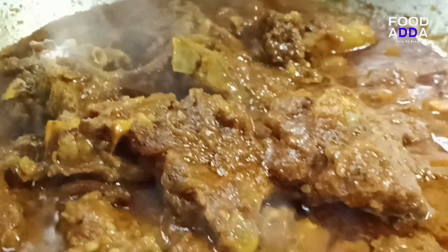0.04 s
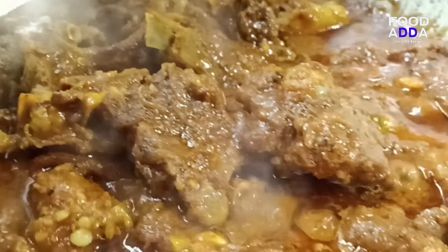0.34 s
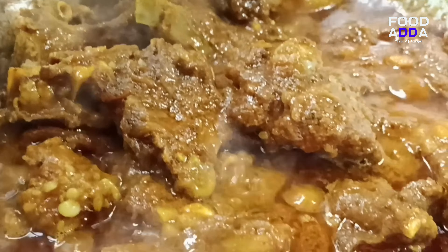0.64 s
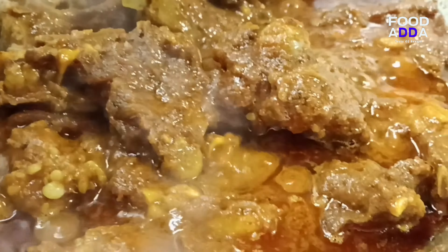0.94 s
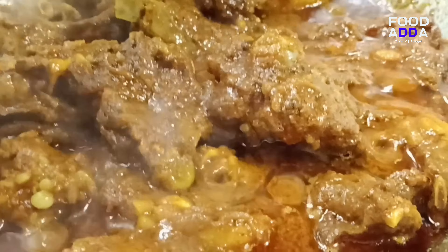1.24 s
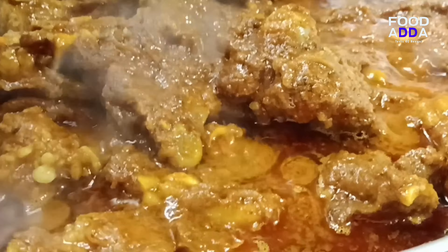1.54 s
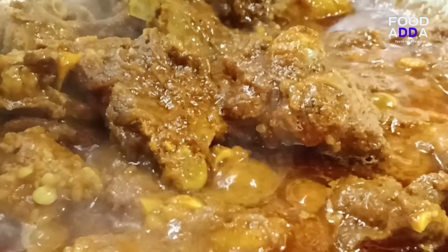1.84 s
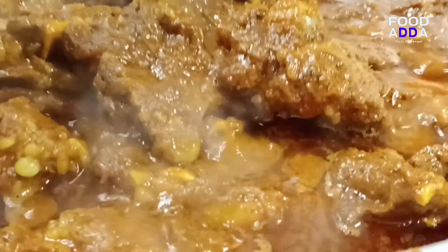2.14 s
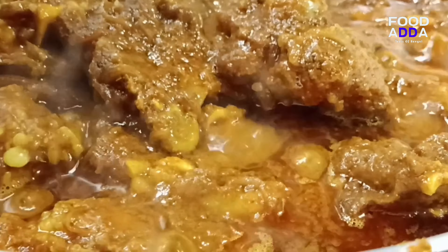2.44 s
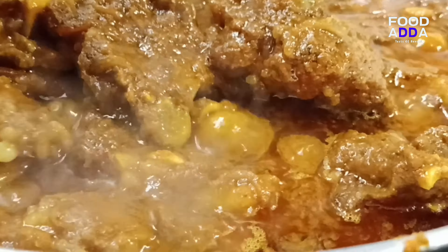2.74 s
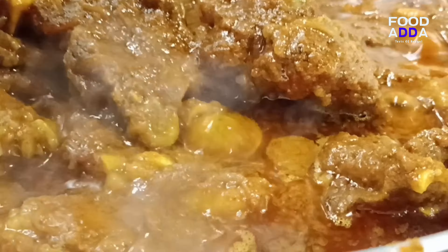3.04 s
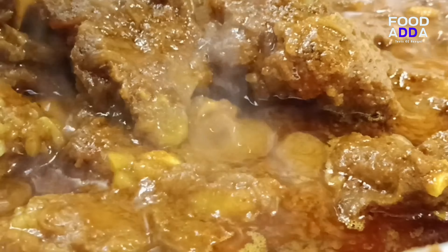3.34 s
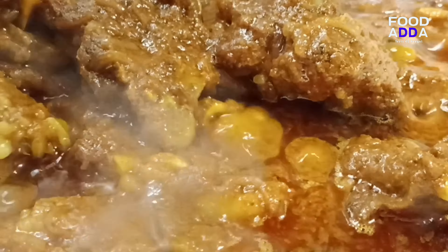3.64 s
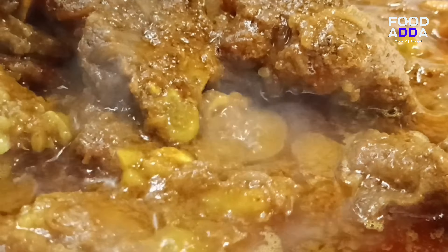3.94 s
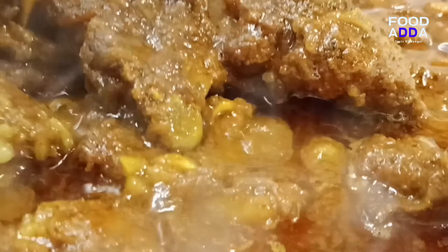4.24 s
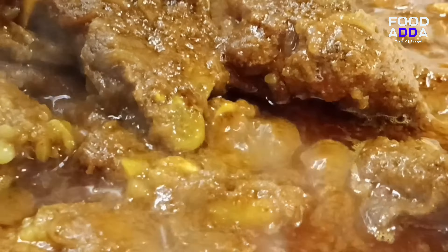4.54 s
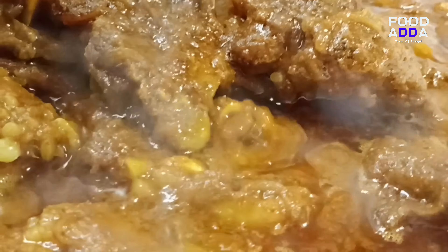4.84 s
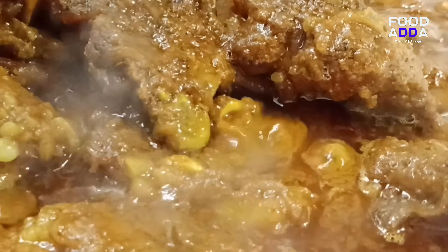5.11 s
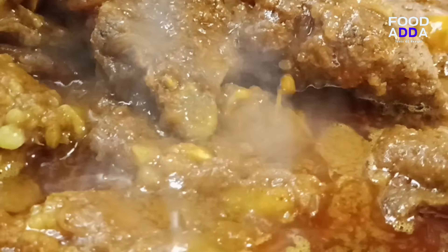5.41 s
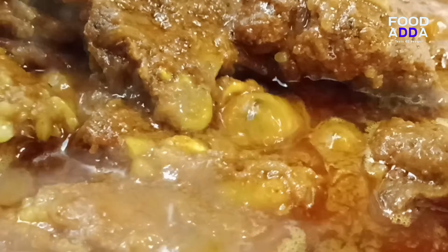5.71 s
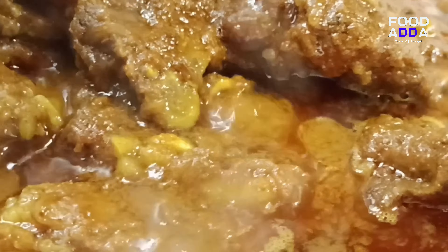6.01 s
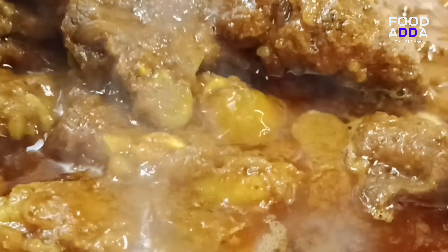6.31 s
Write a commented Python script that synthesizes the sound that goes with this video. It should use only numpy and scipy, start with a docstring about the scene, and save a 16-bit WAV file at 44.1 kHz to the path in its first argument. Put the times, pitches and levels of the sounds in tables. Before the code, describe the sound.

Meat sizzles steadily in thick, oily gravy while a big bubble repeatedly hisses out steam and blubbers shut, with small snaps of fat.

```python
"""Meat sizzles in thick, oily gravy, close up in a small kitchen. A bed of fine frying runs from the
start, with wet spots sputtering over it. Drops of fat snap; small bubbles plip and gurgle. From 0.6 s
one big bubble swells about every two thirds of a second: it lets its steam out with a hiss, then
blubbers shut. Around 3 s, and again just after, steam whistles thinly through a pinhole, while the
frying and the big bubble carry on to the end."""
import sys
import numpy as np
from scipy import signal
from scipy.fft import rfft, irfft, next_fast_len
from scipy.io import wavfile

SR = 44100
rng = np.random.default_rng(int(sys.argv[2]) if len(sys.argv) > 2 else 0)


def transcribe(signal):
    """Save signal, clipped to [-1, 1], as a 16-bit WAV file at the path in sys.argv[1]."""
    frames = np.atleast_2d(signal).T
    limited = np.clip(frames, -1, 1)
    pcm = np.round(limited * 32767).astype(np.int16)
    wavfile.write(sys.argv[1], SR, pcm)


N = 285327
TIME = np.arange(N) / SR

# Levels are set ahead of each layer's own trim and reverb.
# fader ride of the frying bed: t/s, level/dB
FRY_RIDE = [(0, -51), (.72, -51), (.94, -52.5), (1.7, -51), (2.05, -50), (4.45, -50.5), (4.95, -48.5),
            (5.3, -50.5)]
# EQ of the frying bed: f/Hz, level/dB
FRY_EQ = [(400, -17), (800, -17), (1100, -27), (1500, -12), (2200, -9.5), (3600, -0.5), (4350, -10),
          (5300, -1), (6800, -2), (8000, -15), (10000, -22), (12200, -15), (15500, -15)]
# air resonances between the pan's walls: f/Hz, width/Hz, level/dB
PAN_AIR_MODES = [(673, 34, -8), (1070, 70, 0), (1275, 65, 0), (1500, 120, 3), (1980, 130, 2)]
# water meeting hot fat: t/s, length/s, level/dB, f/Hz
SPURT_CUES = [(0, 0.054, -49, 3300), (0.256, 0.12, -51, 3000), (0.496, 0.077, -50, 2976),
              (0.622, .17, -53, 3130), (.84, .12, -52, 3415), (1.027, .095, -51.5, 3080),
              (1.561, 0.095, -54, 3240), (2.135, 0.18, -52.5, 3185), (2.527, 0.075, -53, 3214),
              (2.78, 0.18, -59, 3500), (2.952, 0.057, -51, 3590), (3.1, 0.1, -49.5, 3000),
              (3.459, .2, -58.5, 3280), (3.686, .13, -54.5, 3280), (3.941, 0.14, -50, 3380),
              (4.209, .19, -56.5, 3167), (4.314, 0.021, -50.5, 3420), (4.461, 0.26, -59.5, 3363),
              (4.925, 0.27, -55.5, 3430), (5.729, .13, -55, 3100), (6.16, .1, -54, 3470),
              (6.3, 0.31, -57.5, 3515)]
# the loudest drops of fat snapping: t/s, level/dB, f/Hz, left minus right/dB
SNAP_CUES = [(0.402, -20, 5830, 9), (0.5307, -18, 2740, 8), (2.1435, -22, 3160, 15),
             (2.2555, -14.5, 3170, 3), (3.9936, -24, 3100, 4), (5.6775, -10, 2910, 10.5),
             (5.8192, -25, 5000, 7)]
# the clearest small bubbles bursting: t/s, level/dB, f/Hz
PLIP_CUES = [(0.305, -30.5, 1525), (1.1625, -52, 1060), (2.062, -43, 1255), (2.516, -43, 1520),
             (2.7755, -46, 1100), (2.864, -37.5, 1530), (3.776, -31.5, 2940), (4.369, -37, 1900),
             (4.392, -43.5, 1440), (4.7522, -33, 1730), (5.497, -47.5, 1420)]
# chains of tiny bubbles: t/s, length/s, level/dB, f/Hz
GURGLE_CUES = [(0.311, .04, -61.5, 1140), (0.999, 0.083, -66.5, 1020), (3.155, 0.086, -63.5, 1040),
               (3.505, 0.21, -63, 1257), (4.195, 0.14, -61.5, 1070), (5.946, 0.066, -59, 1290),
               (6.185, .04, -62.5, 1100)]
# the big bubble venting: t/s, length/s, hiss level/dB, whistle level/dB, mouth f/Hz
VENT_CUES = [(0.596, 0.084, -56.5, -75, 2600), (1.298, 0.34, -55.5, -73, 2660),
             (1.97, 0.26, -55, -69, 2456), (2.62, 0.29, -52.5, -65, 2477), (3.255, 0.23, -52, -63, 2203),
             (3.86, 0.26, -56.5, -61, 2327), (4.603, 0.3, -56, -78, 2404), (5.203, .19, -53.5, -50.5, 2080),
             (5.858, 0.34, -54, -78, 2360)]
# EQ of the steam's hiss: f/Hz, level/dB
STEAM_EQ = [(900, -12.5), (1400, -4.5), (2000, 1), (2600, 7.5), (3800, 7), (6500, -1.5), (9500, -18),
            (12500, -9.5), (14500, 0), (15500, -27)]
# the gravy gulping as steam pushes through: t/s, length/s, level/dB, f/Hz
GULP_CUES = [(0.664, 0.17, -65, 105.2), (1.323, 0.095, -62, 63.4), (1.42, 0.08, -55, 157.5),
             (2.07, 0.07, -57, 228), (2.09, 0.14, -53.5, 151.1), (2.677, 0.14, -50.5, 240),
             (2.66, .19, -51.5, 140), (2.66, 0.22, -59, 402), (3.195, 0.04, -58.5, 236.7),
             (3.265, 0.1, -50.5, 153.2), (3.324, 0.13, -53, 235.6), (3.39, 0.15, -54, 135.7),
             (3.69, 0.073, -62, 127.4), (3.929, 0.038, -56, 129), (4.018, 0.1, -54, 136.4),
             (4.663, 0.098, -52.5, 160.4), (4.778, 0.16, -59, 98), (5.272, 0.045, -47, 237),
             (5.33, 0.11, -46, 151), (5.94, 0.063, -55.5, 235.4), (6.0, 0.079, -52.5, 154.5)]
# resonances of the gravy pocket: f/Hz, width/Hz, level/dB
POCKET_MODES = [(50.3, 13, -11.5), (108, 26, 8.5), (164.8, 24.7, 8.5), (250, 44, 9), (464, 270, 8)]
# steam whistling through a pinhole: t/s, length/s, level/dB, f/Hz
PINHOLE_CUES = [(2.9, .3, -51.5, 3130), (3.599, 0.51, -53, 3103)]
# stereo tilt of the microphone pair: f/Hz, left minus right/dB
MIC_BALANCE = [(1150, -0.5), (1800, 3), (2900, 10.5), (4400, 2.5), (5400, 0.5), (6600, 12), (8300, -5.5),
               (10000, -6.5), (14300, 17)]

LEFT_RIGHT = np.array([[1], [-1]])
KITCHEN_T60_S = 0.14


def from_db(db):
    """Decibels to gain."""
    return 10 ** (np.asarray(db) / 20)


def unit_rms(x):
    """Normalise to rms 1."""
    return x / np.sqrt(np.mean(x ** 2) + 1e-20)


def at_hz(curve, hz):
    """Read an EQ curve on a log-frequency axis."""
    known, values = np.transpose(curve)
    return np.interp(np.log(hz + 1e-9), np.log(known), values)


def drift(rate_hz):
    """A smooth random modulator, rms about 1."""
    hop, run_in = 40, 2000
    r = np.exp(-2 * np.pi * hop * rate_hz / SR)
    slow = signal.lfilter([1], [1, -2 * r, r * r], rng.standard_normal(N // hop + run_in + 2))[run_in:]
    return np.interp(np.arange(N) / hop, np.arange(len(slow)), unit_rms(slow))


def resonance(x, hz, width_hz):
    """Two-pole resonator, unity gain at its peak."""
    r = np.exp(-np.pi * width_hz / SR)
    poles = [1, -2 * r * np.cos(2 * np.pi * hz / SR), r * r]
    return signal.lfilter(np.array([1, 0, -1]) * (1 - r * r) / 2, poles, x + 1e-18)


def pass_filter(x, order, hz, kind):
    """Low-, high- or band-pass."""
    return signal.sosfilt(signal.butter(order, hz, kind, fs=SR, output="sos"), x)


def equalise(x, gain_db):
    """Apply an EQ given as a function of Hz."""
    size = next_fast_len(N + SR // 10)
    hz = np.arange(size // 2 + 1) * SR / size
    return irfft(rfft(x, size) * from_db(gain_db(hz)), size)[..., :N]


def bursts(per_s, spread_db):
    """Clicks at random moments: many small, a few large."""
    sizes = from_db(spread_db * np.minimum(rng.exponential(1, N), 5))
    return (rng.random(N) < per_s / SR) * sizes * rng.choice([-1, 1], N)


def swell(start, length):
    """A rounded envelope: its samples, its progress (0 to 1 during the cue) and its gain."""
    span = slice(max(round((start - length) * SR), 0), round((start + 2 * length) * SR))
    life = np.clip((TIME[span] - start) / length, -1, 2)
    return span, life, 1 / (1 + (2 * life - 1) ** 8)


def pan_and_kitchen(x, wall_db, room_db, wall_t60=0.067, lag_s=0.00024):
    """Stereo space: the direct sound (left later), quick slaps off the pan wall, the kitchen's tail."""
    t = np.arange(SR // 2) / SR
    wall, room = rng.standard_normal((2, 2, len(t)))
    wall = wall * (rng.random(wall.shape) < 1 / 10) * (t > .0005) * from_db(-60 * t / wall_t60)
    room = room * (t > .006) * from_db(-60 * t / KITCHEN_T60_S)
    echoes = sum(from_db(db) * tail / np.linalg.norm(tail, axis=1, keepdims=True)
                 for tail, db in ((wall, wall_db), (room, room_db)))
    direct = np.array([np.roll(x, round(lag_s * SR)), x])
    return direct + signal.fftconvolve(x[None], echoes, axes=1)[:, :N]


def crackle(eq, per_s, spread_db, clump_db, patchy_db, cycles):
    """Tiny bubbles of all sizes burst in clumps at four spots of the pan, each ringing briefly."""
    pitches = np.geomspace(400, 16000, 32)
    clicks = bursts(per_s, spread_db) * from_db(clump_db * drift(10))
    band = rng.choice(len(pitches), N, p=pitches / pitches.sum())   # small bubbles are the most common
    lags_s = np.linspace(.0001, .0004, 4)
    spots = np.zeros((len(lags_s), N))
    for k, hz in enumerate(pitches):
        ringing = resonance(clicks * (band == k), hz, hz / cycles)
        spots[k % len(spots)] += unit_rms(ringing) * np.sqrt(hz) * from_db(patchy_db * drift(9.1))
    stereo = sum(pan_and_kitchen(spot, wall_db=4.5, room_db=6, wall_t60=0.031, lag_s=lag)
                 for spot, lag in zip(spots, lags_s))
    return unit_rms(equalise(stereo, lambda hz: at_hz(eq, hz)))


def sizzle():
    """The bed: steady fine frying over a soft simmer that rings in the pan's air."""
    fry = crackle(FRY_EQ, per_s=8000, spread_db=4, clump_db=.8, patchy_db=1.7, cycles=9)
    fader = from_db(np.interp(TIME, *np.transpose(FRY_RIDE)))
    simmer = np.zeros(N)
    for hz, width, db in PAN_AIR_MODES:
        gain = from_db(db + 5 * drift(7))
        simmer += gain * unit_rms(resonance(bursts(per_s=200, spread_db=2), hz, width))
    simmer = unit_rms(pan_and_kitchen(simmer, wall_db=7, room_db=-23))
    return from_db(6) * fader * fry + from_db(-64) * simmer


def singing(hz, width_hz):
    """A cavity stirred by turbulence sings: a noise band riding a pitch curve, rms 1."""
    run_in = SR // 10
    stir = rng.standard_normal((2, run_in + len(hz)))
    a, b = pass_filter(stir, 2, width_hz / 2, "low")[:, run_in:]
    phase = 2 * np.pi * np.cumsum(hz) / SR
    return unit_rms(a * np.cos(phase) + b * np.sin(phase))


def spurts(fade_db=-3, throb_db=4, gap_width_hz=750, wander=.045, rush_db=-1, linger_db=-10):
    """Water hits hot fat in a rush of tiny bursts, rings in its shifting escape gap and sputters out."""
    rush = unit_rms(pass_filter(bursts(per_s=5000, spread_db=5.5), 4, [2400, 4000], "band"))
    bend = np.exp(wander * drift(14))
    throb = from_db(throb_db * drift(52))
    out = np.zeros(N)
    for start, length, db, hz in SPURT_CUES:
        span, life, gain = swell(start, length)
        gain = np.maximum(gain, from_db(linger_db) * (1 - (life - 1) ** 4))
        sputter = singing(hz * bend[span], gap_width_hz) + from_db(rush_db) * rush[span]
        out[span] += from_db(db + fade_db * (life - 1)) * gain * unit_rms(sputter * throb[span])
    return pan_and_kitchen(out, wall_db=-4, room_db=5.5)


def small_drops(per_s=2.9, db=-35.5, hz=5600, scatter_octaves=0.25, scatter_db=4.5):
    """Cues for small drops of fat snapping at loose intervals: t/s, level/dB, f/Hz."""
    timing, strength, tuning = rng.uniform(-1, 1, (64, 3)).T
    starts = (np.arange(len(timing)) + .5 + .5 * timing) / per_s
    cues = np.transpose([starts, db + scatter_db * strength, hz * 2 ** (scatter_octaves * tuning)])
    return cues[starts < TIME[-1] - .01]


def snaps(cycles=2.5, tick_db=-22):
    """A drop of fat bursts with a bright tick and a heavily damped crack; small drops tick the most."""
    out = np.zeros((2, N))
    small = [(start, db, hz, at_hz(MIC_BALANCE, hz)) for start, db, hz in small_drops()]
    for start, db, hz, left_db in [*SNAP_CUES, *small]:
        span = slice(round(start * SR), round(start * SR) + SR // 20)
        life = np.clip((TIME[span] - start) * hz / cycles, 0, 10)
        crack = life ** 2 * np.exp(2 - 4 * life) * np.sin(2 * np.pi * cycles * life)
        crack[8] += from_db(tick_db) * (hz / 2500) ** 2   # one-sample tick on the attack
        lean_db = left_db - at_hz(MIC_BALANCE, hz)   # the microphones add the rest of the panning
        out[:, span] += from_db(db + LEFT_RIGHT * lean_db / 2) * crack
    stereo = np.array([pan_and_kitchen(out[k], wall_db=0, room_db=-1, wall_t60=.12)[k] for k in (0, 1)])
    return from_db(8) * pass_filter(stereo, 2, 1700, "high")


def plips(cycles=9.9, glide=0.0079):
    """A bubble's cavity sings for a few cycles, rising a little as it opens; the pan's air rings on."""
    out = np.zeros(N)
    for start, db, hz in PLIP_CUES:
        span = slice(round(start * SR), round(start * SR) + SR // 20)
        life = np.clip((TIME[span] - start) * hz / cycles, 0, 1)
        envelope = np.abs(np.sin(np.pi * life)) ** .25
        out[span] += from_db(db) * envelope * np.sin(2 * np.pi * cycles * life * (1 + glide * life / 2))
    ring = sum(from_db(db) * resonance(out, hz, width) for hz, width, db in PAN_AIR_MODES)
    return pan_and_kitchen(out + .5 * ring, wall_db=-12, room_db=-8)


def gurgles(per_s=42, cycles=7.5, rise=0.035, scatter_octaves=0.13):
    """Quick chains of tiny bubbles of nearly one size, each chirping upward."""
    out, age = np.zeros(N + SR), np.arange(SR // 25) / SR
    for start, length, db, hz in GURGLE_CUES:
        chain = np.zeros(round(length * SR) + len(age))
        for moment, tuning, strength in rng.random((max(round(per_s * length), 1), 3)):
            turns = age * hz * 2 ** (scatter_octaves * (2 * tuning - 1))
            life, at = turns / cycles, int(moment * length * SR)
            chirp = np.sin(2 * np.pi * turns * (1 + rise * (life - 1) / 2))
            chain[at:at + len(age)] += (1 + strength) * life * np.exp(-3 * life) * chirp
        at = round(start * SR)
        out[at:at + len(chain)] += from_db(db) * unit_rms(chain)
    return from_db(-2.5) * pan_and_kitchen(out[:N], wall_db=4, room_db=-10)


def steam(attack_s=0.02, release_t60=0.45, whistle_hz=14230):
    """Steam tears through the big bubble's skin with a fizzing hiss and a thin, very high whistle."""
    hiss_gain, whistle_gain = np.zeros((2, N))
    for start, length, hiss_db, whistle_db, _ in VENT_CUES:
        age = TIME - start
        release = from_db(-60 * np.maximum(age - 0.34 * length, 0) / release_t60)
        flow = np.clip(age / attack_s, 0, 1) * release
        hiss_gain += flow * from_db(hiss_db)
        whistle_gain += flow * from_db(whistle_db)
    fizz = crackle(STEAM_EQ, per_s=16000, spread_db=2.5, clump_db=.8, patchy_db=2.2, cycles=12)
    whistle = resonance(rng.standard_normal((2, N)), whistle_hz, width_hz=240)
    whistle = unit_rms(resonance(whistle, whistle_hz, width_hz=900))
    return from_db(14) * hiss_gain * fizz + from_db(9) * whistle_gain * whistle


def mouth(width_hz=470, sag=0.21, open_share=0.51):
    """The venting bubble's mouth colours the steam, sinking in pitch as it opens."""
    out = np.zeros(N)
    for start, length, db, _, hz in VENT_CUES:
        span, life, gain = swell(start + .01, open_share * length)
        out[span] += from_db(db) * gain * singing(hz * np.exp(sag * (.5 - life)), width_hz)
    return from_db(4) * pan_and_kitchen(out, wall_db=-3, room_db=1.5)


def blubber(flaps_per_s=400, side_db=-9, sag=.25, floor_db=-71, reach_octaves=0.51, roll_db=-17):
    """Each gulp hums, sinking as its cavity swells; flaps of gravy thump the pocket's nearby modes."""
    hum, drive = np.zeros(N), np.full((len(POCKET_MODES), N), from_db(floor_db))
    waver = 0.047 * drift(32)
    pocket_hz = np.array(POCKET_MODES)[:, :1]
    # low end: the gravy heaves under every vent
    delay_s, heave_s, heave_db, heave_hz = 0.064, .17, -67.5, 53.1
    heaves = [(start + delay_s, heave_s, heave_db, heave_hz) for start, *_ in VENT_CUES]
    for start, length, db, hz in [*GULP_CUES, *heaves]:
        span, life, gain = swell(start, length)
        gain = from_db(db) * np.maximum(gain, from_db(roll_db) * (1 - (life - 1) ** 4))   # rolls on
        pitch = hz * np.exp(sag * (.5 - life) + waver[span])
        hum[span] += gain * np.sin(2 * np.pi * np.cumsum(pitch) / SR)
        drive[:, span] += gain * np.exp(-(np.log2(pocket_hz / pitch) / reach_octaves) ** 2 / 2)
    flaps = np.array([bursts(flaps_per_s, spread_db=0) for _ in range(2)])
    mid, side = sum((-1) ** k * drive[k] * from_db(db) * unit_rms(resonance(flaps, hz, width))
                    for k, (hz, width, db) in enumerate(POCKET_MODES))
    thumps = pass_filter(mid + from_db(side_db) * side * LEFT_RIGHT, 4, 500, "low")
    return from_db(-12) * thumps + from_db(2.5 + drift(26)) * hum


def pinhole(width_hz=85, waver=0.00306):
    """Steam through a pinhole: a thin, breathy whistle, near steady in pitch, fluttering in level."""
    bend = np.exp(waver * drift(5.94))
    flutter = from_db(3.5 * drift(20))
    out = np.zeros(N)
    for start, length, db, hz in PINHOLE_CUES:
        span, _, gain = swell(start, length)
        out[span] += from_db(db) * gain * unit_rms(flutter[span] * singing(hz * bend[span], width_hz))
    return pan_and_kitchen(out, wall_db=-9, room_db=-6)


def scene():
    """The stereo mix of everything in the pan."""
    return sizzle() + steam() + mouth() + pinhole() + blubber() + gurgles() + plips() + snaps() + spurts()


def record(dry):
    """Each microphone has its own colour; a steep high cut at 15.8 kHz takes off the top."""
    def microphones_db(hz):
        """Constant-power panning, frequency by frequency."""
        lead_db = at_hz(MIC_BALANCE, hz) * LEFT_RIGHT
        return -10 * np.log10((1 + from_db(-lead_db) ** 2) / 2)
    high_cut = signal.ellip(12, .1, 80, 15800, fs=SR, output="sos")
    return signal.sosfilt(high_cut, equalise(dry, microphones_db))


dry = scene()
out = record(dry)
transcribe(out)
```